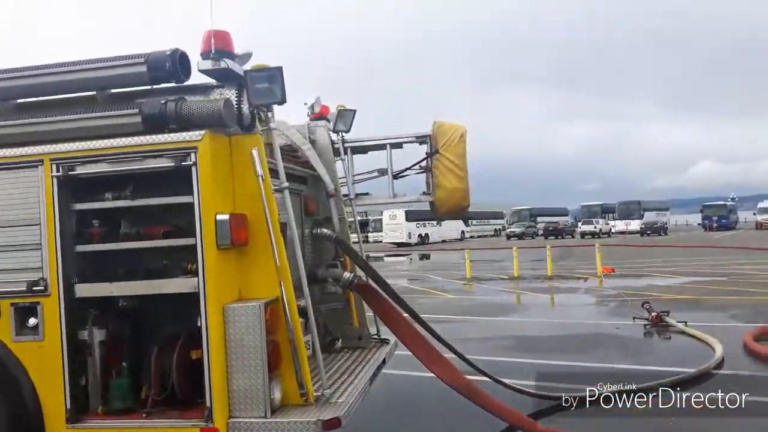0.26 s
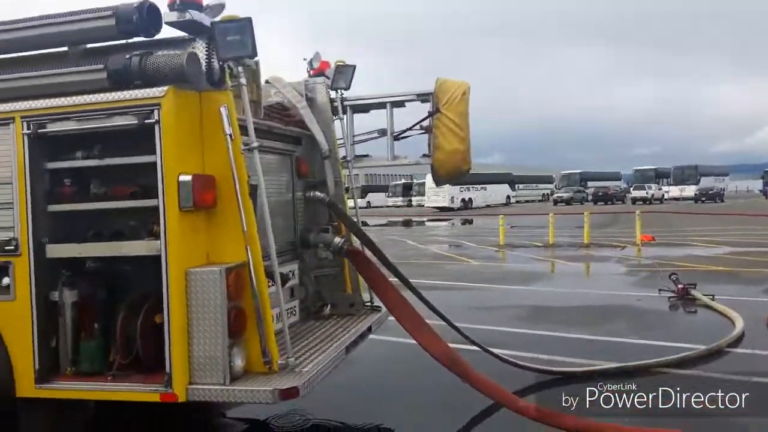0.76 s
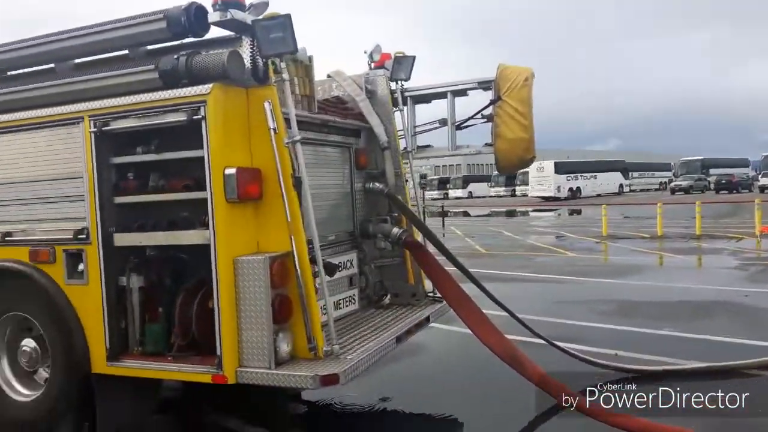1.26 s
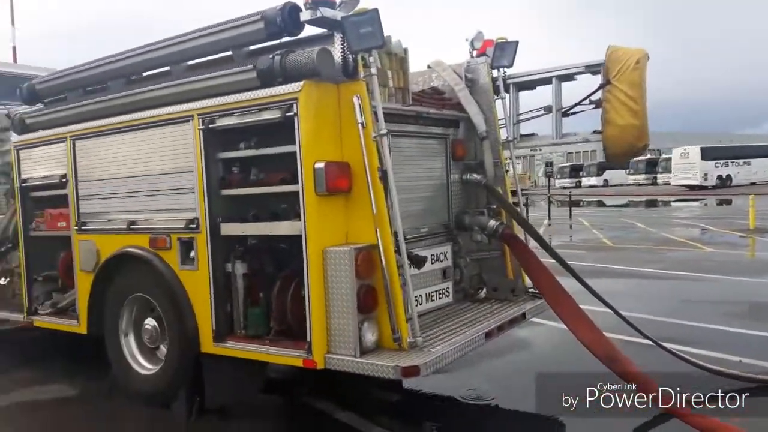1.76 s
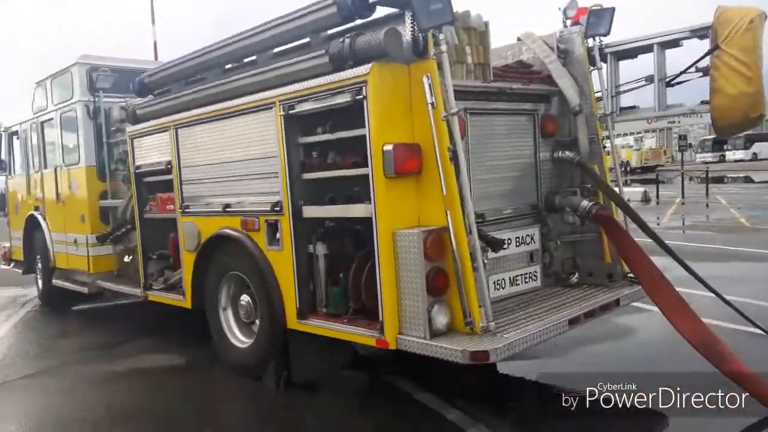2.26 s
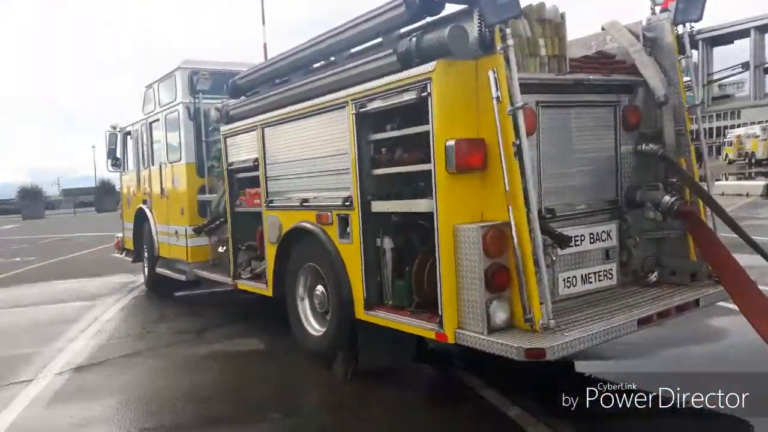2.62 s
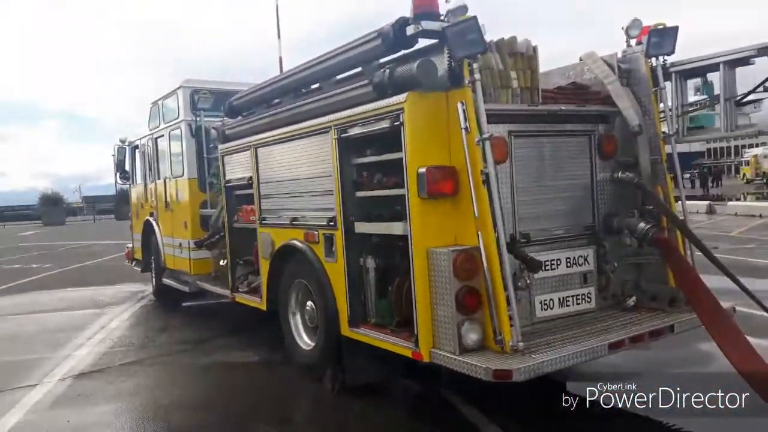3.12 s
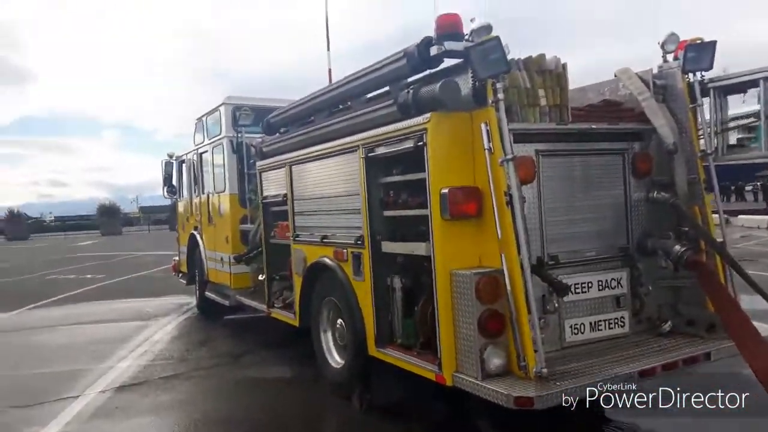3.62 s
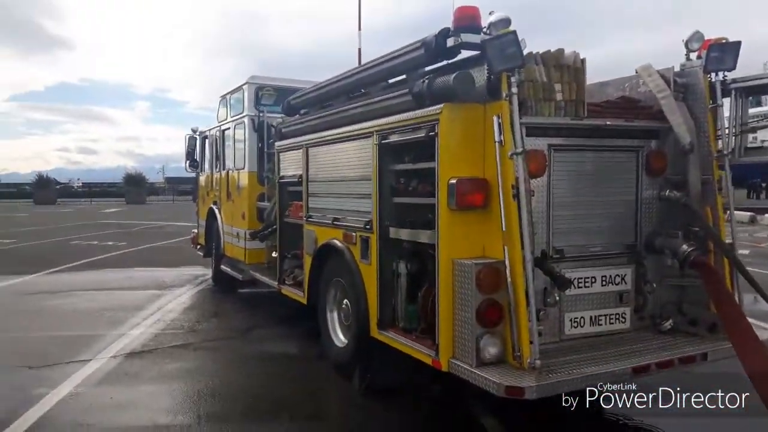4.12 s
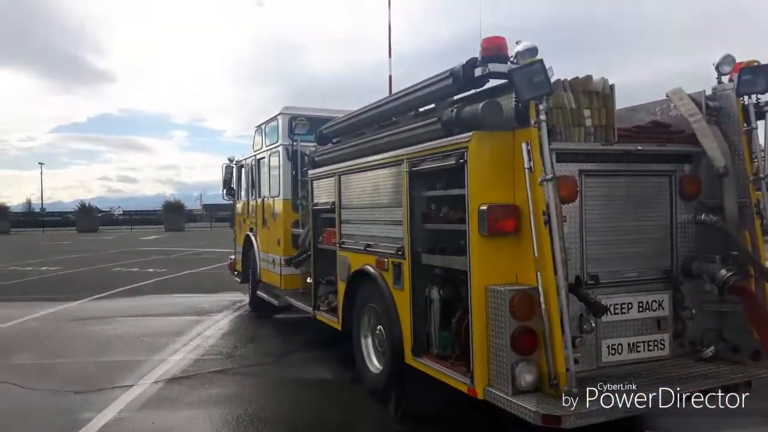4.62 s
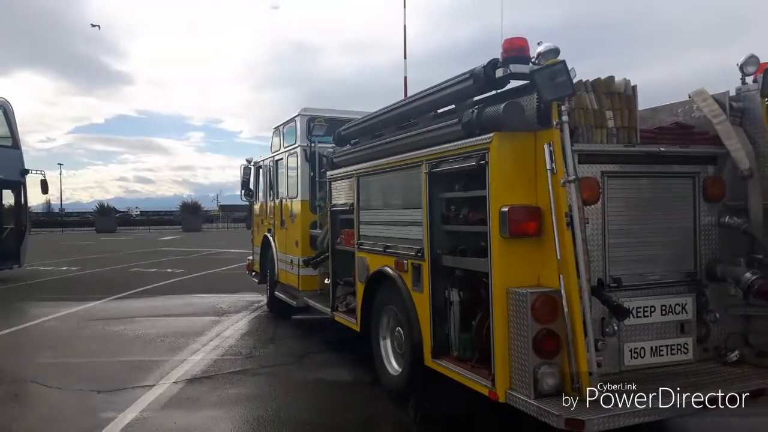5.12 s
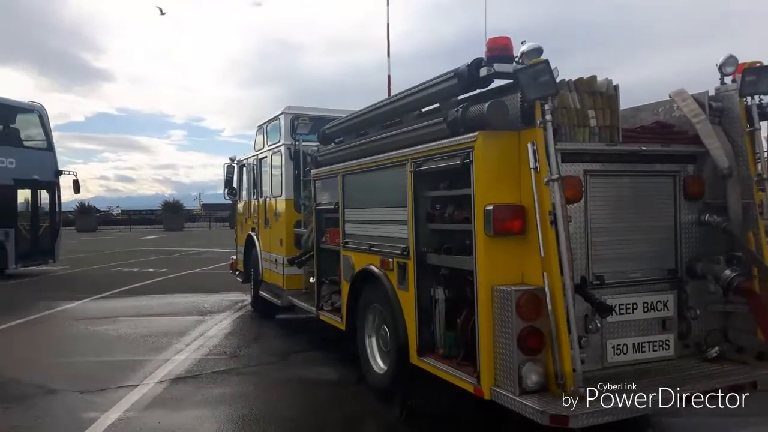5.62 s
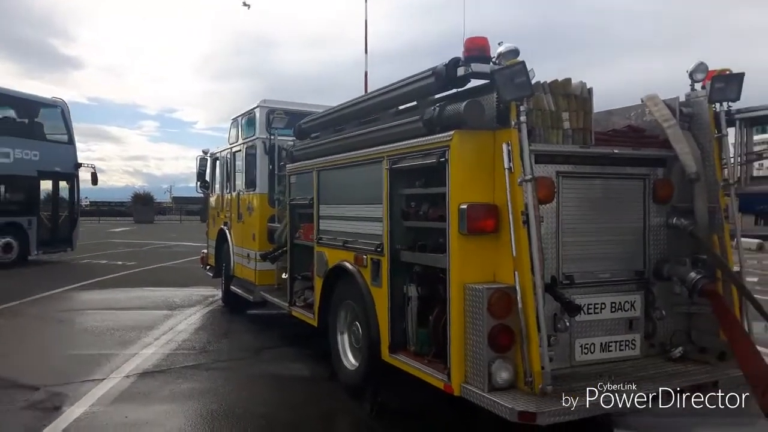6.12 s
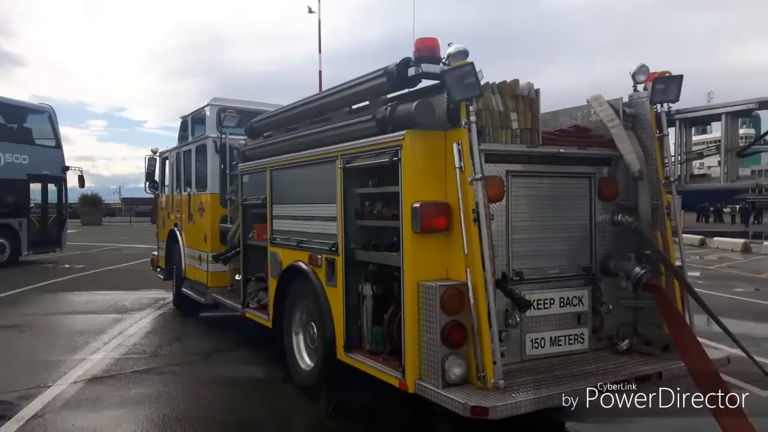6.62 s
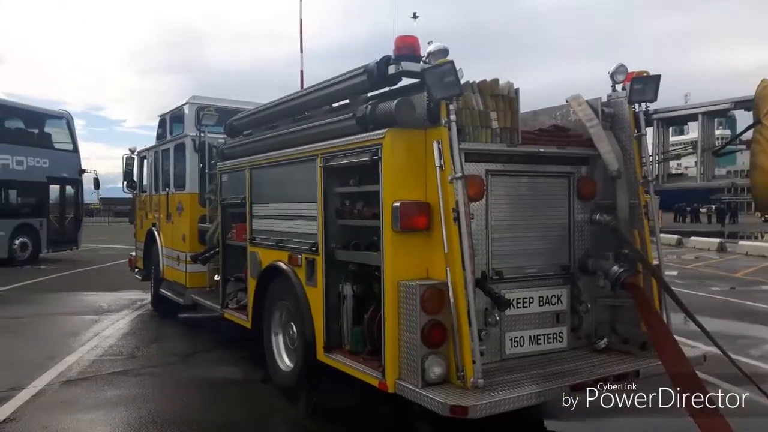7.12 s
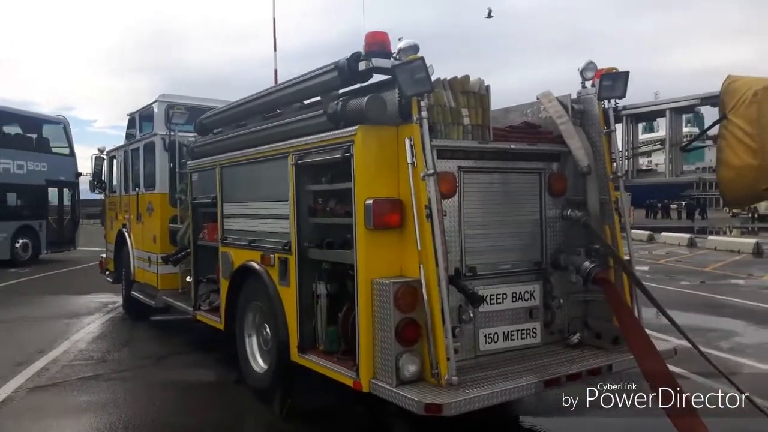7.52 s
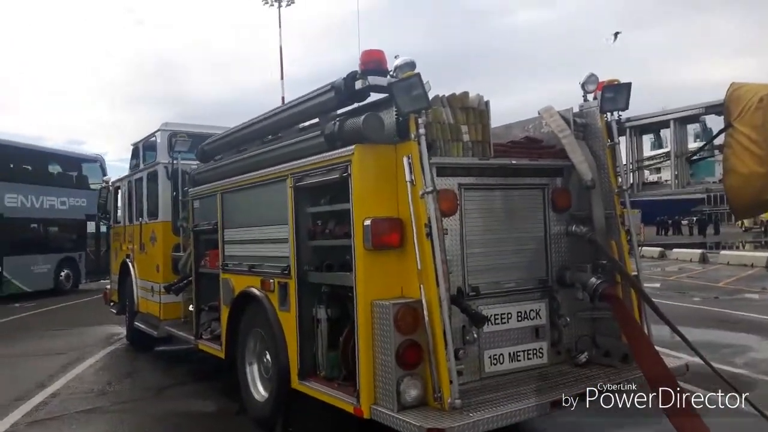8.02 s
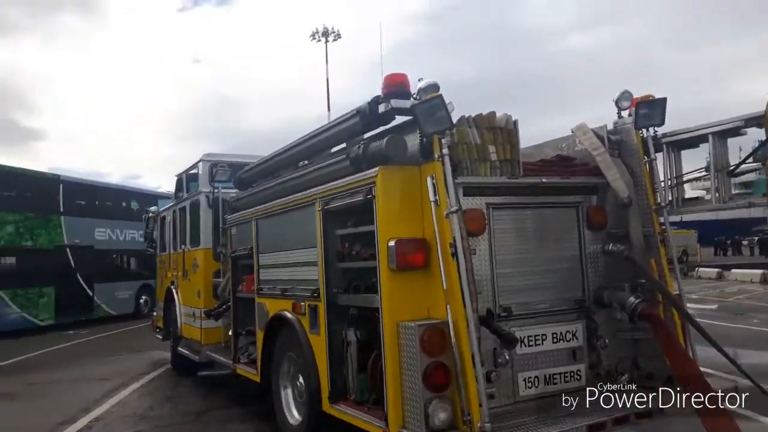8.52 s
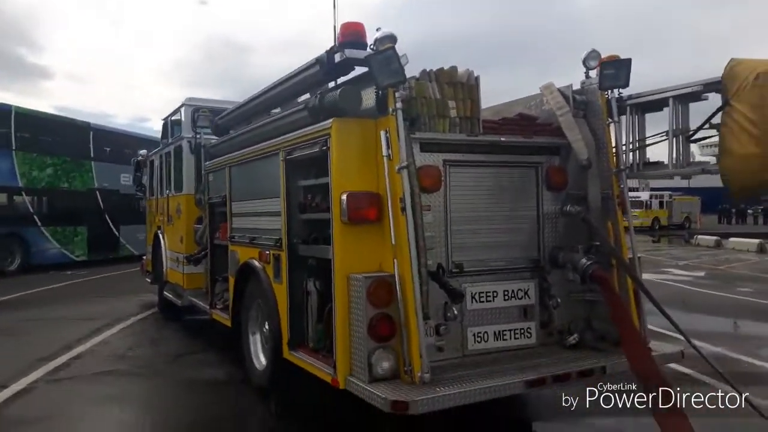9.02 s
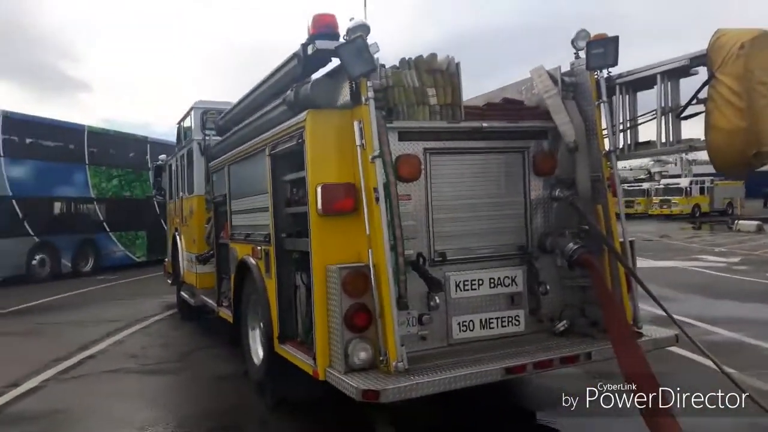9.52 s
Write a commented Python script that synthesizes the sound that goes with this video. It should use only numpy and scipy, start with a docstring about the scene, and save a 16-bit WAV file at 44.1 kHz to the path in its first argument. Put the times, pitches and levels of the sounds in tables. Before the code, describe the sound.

Outdoors on an open, wet asphalt lot, a large six-cylinder diesel runs continuously at a fast idle of about 1050 rpm, driving a pump. From 0 to 2 seconds, heard from behind, it is a low exhaust drone and hollow midrange roar with gear whine around 700 to 750 hertz fading by 1.5. From 2 to 5 seconds the microphone moves round to the side; injector clatter becomes brighter and the whine returns, wavering. Gritty shoe scuffs come at 3.3 to 4.2, with a sharp click near 4.1, then small dry ticks from 4.7 to 6.8. Engine speed sags slightly near 5.5 and recovers. Very faint high whistle and air hiss sit on top. From 9 seconds wind thumps the microphone, strongest at 9.1, 9.4 and 9.6, while the engine picks up and its pitch rises until the end at about 9.8.

```python
"""On a wet, open asphalt lot a fire engine's six-cylinder diesel turns at about 1050 rpm to drive its pump.
The listener walks from the tail round to the side, where the injector clatter is louder.
Noise pulsed by the firing makes exhaust, block and clatter; crank-locked tones make the whine of gears.
Sine tones of wandering pitch make the faint turbo whistle, short noise bursts the scuffing shoes.
At the end the engine picks up while puffs of wind, drawn as pressure curves, thump on the microphone."""
import sys
import numpy as np
from scipy import signal
from scipy.fft import rfft, irfft, next_fast_len
from scipy.io import wavfile
from scipy.ndimage import uniform_filter1d

SR = 44100
rng = np.random.default_rng(int(sys.argv[2]) if len(sys.argv) > 2 else 0)


def digitize_waveform(pressure):
    """Quantize a signal to 16-bit integers and store it at the path in sys.argv[1].

    Rows of a 2-D input are taken as channels; values are limited to [-1, 1].
    """
    field = np.atleast_2d(pressure).T
    bounded = np.clip(field, -1, 1)
    quanta = np.round(bounded * 32767).astype(np.int16)
    wavfile.write(sys.argv[1], SR, quanta)


N = 430416   # length in samples
CYLINDERS = 6
CUTOFF_HZ = 15500   # the sound is cut steeply above this


def from_db(db):
    """Decibels to gain."""
    return 10 ** (np.asarray(db) / 20)


def rms_one(x):
    """Scale to unit rms."""
    return x / np.sqrt(np.mean(x ** 2) + 1e-20)


def in_time(rows):
    """One curve per column after the seconds, joined by straight lines."""
    s, *columns = np.transpose(rows)
    return [np.interp(np.arange(N) / SR, s, c) for c in columns]


def bell(x, centre, half_width):
    """A smooth hump of height 1, down to 1/e at the half-width."""
    return np.exp(-np.minimum(((x - centre) / half_width) ** 2, 50))


def drift(rate):
    """Random wander with rms 1: noise through two equal low-pass poles at `rate` Hz."""
    step = 40   # samples between the points of the wander
    r = np.exp(-2 * np.pi * rate * step / SR)
    noise = rng.standard_normal(N // step + 2002)
    slow = signal.lfilter([1], [1, -2 * r, r * r], noise)[2000:]   # drop the filter's start
    return np.interp(np.arange(N) / step, np.arange(len(slow)), rms_one(slow))


def colour(x, spectrum):
    """Filter a signal by a curve of (Hz, dB) points, rolled off outside its ends; rms 1."""
    size = next_fast_len(N + 8192)
    hz, db = np.transpose(spectrum)
    bins = np.maximum(np.fft.rfftfreq(size, 1 / SR), 1)
    gain = from_db(np.interp(np.log(bins), np.log(hz), db))
    gain *= np.minimum(1, bins / hz[0]) ** 2    # 12 dB per octave below
    gain *= np.minimum(1, hz[-1] / bins) ** 4   # 24 dB per octave above
    return rms_one(irfft(rfft(x, size) * gain, size)[:N])


def passing(db, swells):
    """Gain along the walk: the level all round, plus in power a swell wherever a beam is crossed."""
    t = np.arange(N) / SR
    beams = sum((from_db(top_db) * bell(t, s, half_s)) ** 2 for s, top_db, half_s in swells)
    return np.sqrt(from_db(db) ** 2 + beams)


def tone(turns, order, flutter):
    """A line at `order` cycles per unit of `turns`, fluttering in level and phase in the moving air."""
    phase = 2 * np.pi * (order * turns + rng.random()) + flutter * drift(4.7)
    return rms_one((1 + flutter * drift(3.3)) * np.cos(phase))


def firing(turns, depth, decay, uneven_db, alternate_db):
    """Each cylinder fires once in two turns, every other one louder; the blow swells and dies by the next."""
    count = turns * CYLINDERS / 2
    index, since = count.astype(int), count % 1
    own = rms_one(rng.standard_normal(CYLINDERS))[index % CYLINDERS]   # returns with the cylinder
    chance = rng.standard_normal(index[-1] + 1)[index]                 # new for every firing
    strength_db = uneven_db * (own / 2 + chance) / 2 + alternate_db * (index % 2)
    blow = from_db(strength_db) * np.exp(-since / decay) * np.sin(np.pi * since)
    depth = np.clip(depth, 0, 1)
    return 1 - depth + depth * rms_one(blow)


def shaking(turns, repeat):
    """Vibration that partly repeats with every two-turn engine cycle, its pattern changing slowly."""
    size, same = int(2 * N / turns[-1]), 0   # samples in a mean cycle
    for _ in range(3):   # three patterns fade in and out of each other
        cycle = signal.resample(rng.standard_normal(size), 4 * size)
        same = same + drift(0.38) * cycle[(turns / 2 % 1 * len(cycle)).astype(int)]
    same = same / np.sqrt(uniform_filter1d(same ** 2, size=SR // 2) + 1e-9)   # even out the level
    repeat = np.clip(repeat, 0, 1)
    return np.sqrt(repeat) * same + np.sqrt(1 - repeat) * rng.standard_normal(N)


# Listener's position. Each row: time in seconds, place (0 behind the truck, 0.5 rear corner, 1 beside it).
POSITION = [(0, 0.17), (1.3, 0.12), (2.2, 0.4), (2.8, 0.4), (4, 0.59), (4.6, 0.68), (5.1, 0.9),
            (9.76, 0.87)]


def as_heard(x, spectra):
    """Blend the spectra that belong to evenly spaced places along the walk."""
    place = np.clip(in_time(POSITION)[0], 0, 1) * (len(spectra) - 1)
    return sum(np.maximum(1 - abs(place - k), 0) * colour(x, spectrum)
               for k, spectrum in enumerate(spectra))


# Tone of the air hiss. Each row: frequency in Hz, relative level in dB per Hz.
HISS_SPECTRUM = [(3000, -7.5), (6000, 0.5), (6900, 4.5), (7600, 3), (8300, 3.5), (8800, 0), (9600, 2.5),
                 (10500, 0), (12400, 1), (13200, 4), (15400, 2.5)]


def air_hiss(level_db):
    """Steady noise, shaped towards the treble, follows the hiss level along the walk."""
    return from_db(level_db) * colour(rng.standard_normal(N), HISS_SPECTRUM)


# Tone of the wind noise. Each row: frequency in Hz, relative level in dB per Hz.
WIND_SPECTRUM = [(20, -26), (45, -12), (75, 0), (120, 2), (180, 0), (280, -16.5), (600, -39), (2000, -68)]
# Gusts swelling out of the breeze. Each row: centre in seconds, top level in dB, half-length in seconds.
WIND_GUSTS = [(0.998, -40, 2.1), (3.297, -37.5, 0.26), (9.003, -40.5, 0.57), (9.39, -31, 0.049),
              (9.632, -30, 0.18)]
# Single eddies. Each row: centre in seconds, approximate peak level in dB, width of the peak (sigma) in ms.
WIND_PUFFS = [(9.01, -21, 1.7), (9.1176, -11.5, 0.94), (9.127, -10.5, 1.15), (9.135, -19, 0.73),
              (9.336, -15, 1.2), (9.371, -17, 0.97), (9.381, -16, 1.1), (9.3935, -12.5, 0.94),
              (9.412, -19, 1), (9.455, -22, 1.3), (9.593, -4, 0.79), (9.617, -19, 1), (9.632, -17, 1.1),
              (9.741, -18, 1.1)]
BREEZE_DB = -60
TROUGH_LAG, TROUGH_WIDTH = 0.88, 2.6   # lag in units of the puff's width; breadth of the trough


def wind():
    """Turbulence comes in lumpy gusts; an eddy is a sharp peak and a wider, later trough of like area."""
    t = np.arange(N) / SR
    gusts = sum(from_db(db) * bell(t, s, half_s) for s, db, half_s in WIND_GUSTS)
    lumps = from_db(2.1 * drift(13))
    out = (from_db(BREEZE_DB) + gusts) * lumps * colour(rng.standard_normal(N), WIND_SPECTRUM)
    for s, db, ms in WIND_PUFFS:
        away = (t - s) / (ms / 1000) / np.sqrt(2)
        peak = TROUGH_WIDTH * bell(away, 0, 0.97)
        trough = bell(away, TROUGH_LAG / np.sqrt(2), TROUGH_WIDTH)
        out = out + from_db(db) * (peak - trough) / (TROUGH_WIDTH - 1)
    return out


# Hums, perhaps from other vehicles. Each row: pitch in Hz, rms level all round in dB, and a list of
# swells, each with centre in seconds, rms level in dB and half-length in seconds.
STEADY_HUMS = [(146, -48, []), (236, -47, []), (292.9, -50.5, [(3.1, -38, .5), (7.1, -39, 0.81)]),
               (562, -55.5, [(3.15, -42.5, 0.84), (6.4, -47, .5)]), (592, -59, [(8.1, -48.5, .5)])]


def hums():
    """Hums hold their pitch whatever the engine does."""
    t = np.arange(N) / SR
    return sum(passing(db, swells) * tone(t, hz, flutter=0.22) for hz, db, swells in STEADY_HUMS)


# Shoe scuffs and ticks on the asphalt, and four very faint treble ticks (those below -60 dB).
# Each row: start in seconds, level before the decay in dB, band centre in Hz, bandwidth in octaves,
# decay time in seconds.
SCUFFS_AND_TICKS = [(.296, -71.5, 10600, .6, 0.014), (.667, -69, 11000, 1, 0.0055),
                    (2.794, -41, 2800, 1, .005), (2.842, -68, 13000, .6, .015),
                    (3.016, -70, 13000, .6, .008), (3.325, -41, 2200, 1.05, .03),
                    (3.399, -42, 2150, 1.6, 0.011), (3.485, -40, 2100, 1.3, 0.034),
                    (3.542, -32.5, 1740, .9, 0.009), (3.66, -42, 2100, 1.3, .012),
                    (3.829, -36, 1650, 1.2, 0.007), (4.049, -36, 1450, 1.5, 0.044),
                    (4.083, -22.5, 1520, 0.72, 0.0045), (4.105, -37, 1550, 1.2, 0.035),
                    (4.157, -34.5, 1750, 1.8, 0.02), (4.66, -29, 3000, .6, 0.002),
                    (5.008, -30, 2600, 0.64, 0.005), (5.338, -38, 3200, 0.46, .005),
                    (5.534, -33, 3100, .5, 0.0068), (5.674, -37, 3100, .5, .006),
                    (6.118, -31.5, 3050, .5, 0.0077), (6.292, -30.5, 3100, .5, .002),
                    (6.821, -37, 2850, 0.7, .012)]


def scuffs_and_ticks():
    """Short bursts of spiky, band-limited noise: shoes on the asphalt, and a few faint treble ticks."""
    out, t = np.zeros(N), np.arange(SR // 4) / SR
    for s, db, hz, octaves, decay in SCUFFS_AND_TICKS:
        spiky = rng.standard_normal(len(t)) * np.sqrt(rng.exponential(1, len(t)))
        half = 2 ** (octaves / 2)
        edges = [hz / half, min(hz * half, CUTOFF_HZ)]
        band = signal.butter(5, edges, "band", fs=SR, output="sos")
        burst = signal.sosfilt(band, spiky * np.exp(-t / decay))
        at = round(s * SR)
        out[at:at + len(t)] += from_db(db) * burst / np.std(signal.sosfilt(band, spiky))
    return out


# Whistle pitch. Each row: time in seconds, frequency in Hz.
TURBO_PITCH = [(0, 13230), (1.2, 13120), (2.0, 13050), (2.7, 13080), (3.4, 13500), (4.1, 13250),
               (4.7, 13300), (5.8, 12640), (6.2, 12930), (7.1, 13170), (7.7, 13070), (8.2, 12760),
               (8.7, 12730), (9.35, 13030), (9.76, 13650)]
# Patches where the whistle carries. Each row: centre in seconds, rms level in dB, half-length in seconds.
TURBO_PATCHES = [(.45, -86, .5), (1.2, -80, 0.33), (3.398, -86, .4), (4.6, -86, .4), (5.85, -82, .6),
                 (7, -85, 2.6), (7.4, -76.5, .5), (8.55, -77.5, 0.43), (9.4, -81, .45)]
TURBO_DB = -97.5   # level between the patches
# Fainter, lower whistle. Each row: time in seconds, frequency in Hz, rms level in dB.
BREATHY_WHISTLE = [(0, 8350, -104), (1.2, 8330, -90), (1.7, 8330, -108), (3.6, 8450, -104),
                   (4.3, 8450, -89), (5.0, 8400, -96), (6.3, 8350, -97), (7.0, 8350, -88), (8.3, 8100, -86),
                   (8.8, 8150, -94), (9.76, 8400, -96)]


def whistle(hz, jitter_hz, waver_db, waver_rate):
    """A sine with jittered pitch and wavering level; rms 1."""
    sine = np.sin(2 * np.pi * np.cumsum(hz + jitter_hz * drift(90)) / SR)
    return rms_one(sine * from_db(waver_db * drift(waver_rate)))


def turbo():
    """Compressor blades whistle at an unsteady pitch, in patches, with a breathier whistle lower down."""
    hz, = in_time(TURBO_PITCH)
    low_hz, low_db = in_time(BREATHY_WHISTLE)
    blades = passing(TURBO_DB, TURBO_PATCHES) * whistle(hz, 40, waver_db=2, waver_rate=14)
    lower = from_db(low_db) * whistle(low_hz, 65, waver_db=3, waver_rate=6)
    return blades + lower


# Swells of the belt whine. Each row: centre in seconds, rms level in dB, half-length in seconds.
BELT_BEAMS = [(3.1, -40.5, 1.3), (9.1, -45, .45), (9.72, -42, .15)]
BELT_DB = -48   # level all round
BELT_ORDER, BELT_SLIP = 36.9, .0022   # cycles per crank turn; spread of the slip as a fraction of speed


def belt_whine(speed):
    """A belt-driven accessory, perhaps the alternator, follows the crank loosely as the belt slips."""
    turns = np.cumsum(speed * (1 + BELT_SLIP * drift(1.5))) / SR
    return passing(BELT_DB, BELT_BEAMS) * tone(turns, BELT_ORDER, flutter=0.16)


# Level of the pump's gear whine. Each row: time in seconds, rms level in dB.
PUMP_LEVEL = [(0, -41), (0.6, -36), (1.1, -39.5), (1.5, -60), (2.2, -52.5), (2.9, -42), (4, -35),
              (4.6, -40), (5.1, -36), (5.5, -42.5), (6, -38.5), (7.1, -37.5), (7.9, -41.5), (8.25, -47.5),
              (8.7, -38), (9.1, -39.5), (9.4, -61), (9.76, -45)]
PUMP_ORDER = 42   # cycles per crank turn


def pump_whine(turns):
    """The pump's drive gears sing on one line, which comes and goes along the walk."""
    return from_db(in_time(PUMP_LEVEL)[0]) * tone(turns, PUMP_ORDER, flutter=0.22)


# Engine and gear tones, beamed by the bodywork. Each row: order in cycles per crank turn, rms level all
# round in dB (db), and swells, each with centre in seconds, rms level in dB and half-length in seconds.
ENGINE_TONES = [ dict(order=3, db=-60.5, swells=[(2.5, -51.5, 2.2)]),
                dict(order=6, db=-43, swells=[(3.3, -40, .8), (8.7, -44, 0.95)]),
                dict(order=7, db=-49.5, swells=[]), dict(order=9, db=-44.5, swells=[(1.9, -36.5, .6),
                (5.1, -38.5, 1.2), (7.3, -38.5, 0.96)]), dict(order=10.5, db=-54, swells=[(5.4, -45, 1.8),
                (7.8, -44, .9)]), dict(order=12, db=-55.5, swells=[(7, -47, 2.3)]),
                dict(order=12, db=-46, swells=[(1.7, -39.5, 1.0), (4.3, -40, .6), (6, -45.5, 1)]),
                dict(order=15, db=-56.5, swells=[(7.4, -46, 1.5), (9.6, -43, .4)]),
                dict(order=16, db=-56, swells=[(6.8, -45, 1.8)]),
                dict(order=17, db=-41.5, swells=[(.1, -35, 0.53), (7, -38.5, 1), (9.45, -31.5, 0.54)]),
                dict(order=18, db=-50, swells=[(2.6, -38.5, 0.43), (6.2, -37, 0.58), (7.6, -43, 0.7),
                (9.45, -37, 0.37)]), dict(order=19, db=-46.5, swells=[(4.4, -39.5, 1.4)]),
                dict(order=19.5, db=-51, swells=[(1.8, -39, 0.6), (5.1, -37.5, 0.77)]),
                dict(order=22.5, db=-53.5, swells=[(4.1, -43, 0.45), (6.3, -40.5, 1.5)]),
                dict(order=24, db=-52, swells=[(4.5, -41, 0.58), (8.3, -44.5, 0.77)]),
                dict(order=25.5, db=-57, swells=[(2.15, -40.5, .3), (4.8, -43, 0.91)]),
                dict(order=30, db=-59, swells=[(.2, -47, .7), (9.4, -49.5, .45)]),
                dict(order=34, db=-52.5, swells=[(2.8, -48.5, 1.3)]),
                dict(order=41, db=-54.5, swells=[(3.6, -47.5, 1), (7.6, -45.5, .8)]),
                dict(order=51, db=-58, swells=[(7.4, -43, 1.1)]),
                dict(order=55.5, db=-62.5, swells=[(3.9, -53, .8)]),
                dict(order=60, db=-57.5, swells=[(9.7, -54, 0.4)]), dict(order=62, db=-53.5, swells=[]),
                dict(order=63.5, db=-55, swells=[(5.05, -46, 0.47), (9.2, -52, .6)]),
                dict(order=73.75, db=-60.5, swells=[(9.4, -48.5, 0.38)]),
                dict(order=105, db=-66, swells=[(9.25, -54.5, .35)]),
                dict(order=110.25, db=-65.5, swells=[(7.74, -56.5, 0.38)]),
                dict(order=119, db=-66, swells=[(8.85, -51, 0.18)]),
                dict(order=144.75, db=-70.5, swells=[(9.25, -53, 0.38)]),
                dict(order=147.5, db=-68.5, swells=[(9.3, -52.5, 0.39)]),
                dict(order=166.5, db=-71, swells=[(9.45, -55, .4)]),
                dict(order=170.5, db=-71, swells=[(9.25, -56, .4)])]


def beamed_tones(turns):
    """Engine and gear orders, each wavering and swelling in its own places."""
    return sum(passing(row["db"], row["swells"]) * tone(turns, row["order"], flutter=0.25)
               for row in ENGINE_TONES)


# Clatter from behind, at the rear corner, beside. Each row: frequency in Hz, relative level in dB per Hz.
TICKS_BEHIND = [(1200, -28), (2000, 5), (2500, 3), (2900, -7), (3500, 5.5), (4100, -2.5), (4500, -14.5),
                (5300, -19.5), (6400, -23.5), (7500, -43.5), (11000, -61)]
TICKS_CORNER = [(1200, -15.5), (2000, 4), (2450, -0.5), (2900, 0.5), (3450, -3), (3800, -8), (4100, -14),
                (4500, -17), (5300, -21.5), (6400, -27.5), (7500, -43.5), (11000, -59.5)]
TICKS_BESIDE = [(1500, -4.5), (2100, -5.5), (2450, -8), (2700, -2), (2900, -3.5), (3400, 1.5), (3750, -4.5),
                (3980, -24.5), (4180, -5.5), (4500, -32.5), (4830, -15.5), (5650, -24.5), (6200, -45),
                (9000, -59.5)]
CRACKLE_DB = 1.0   # spread in strength of the quick contacts


def clatter(turns, level_db):
    """Injectors and valves tick in a crackle of uneven contacts; the body shades them from behind."""
    contacts = from_db(0.48 * drift(14) + CRACKLE_DB * drift(250))
    blows = firing(turns, depth=0.15, decay=0.29, uneven_db=7.0, alternate_db=6)
    ticks = shaking(turns, repeat=0.38) * blows * contacts
    return from_db(level_db) * as_heard(ticks, [TICKS_BEHIND, TICKS_CORNER, TICKS_BESIDE])


# Ring of the block and pump casing. Each row: frequency in Hz, relative level in dB per Hz.
BLOCK_SPECTRUM = [(300, -24.5), (480, 2), (570, 5), (690, 2), (810, 0.5), (950, 2), (1130, 1.5), (1350, -5),
                  (1650, -8.5), (1980, -16), (2400, -31.5), (3600, -51)]


def block(turns, level_db):
    """Combustion knock rings in the block and pump casing."""
    blows = firing(turns, depth=0.22, decay=0.28, uneven_db=4.5, alternate_db=3.5)
    return from_db(level_db) * colour(shaking(turns, repeat=0.45) * blows, BLOCK_SPECTRUM)


# Exhaust drone at four evenly spaced places from behind the truck to beside it.
# Each row: frequency in Hz, relative level in dB per Hz.
EXHAUST_BEHIND = [(20, -44), (38, -16), (52, -7), (75, -5), (110, -2.5), (155, 2), (205, 5), (250, -10),
                  (315, -3), (365, -3), (420, -2), (490, -4), (800, -35)]
EXHAUST_ONE_THIRD = [(20, -41.5), (38, -20.5), (52, -7.5), (78, -6.5), (110, -4.5), (155, 3.5), (205, -1),
                     (250, -2.5), (315, 1.5), (365, -3.5), (420, -4.5), (490, -5.5), (800, -37)]
EXHAUST_TWO_THIRDS = [(20, -39), (38, -22.5), (54, -7.5), (78, -4.5), (110, -2.5), (155, 3), (205, -0.5),
                      (250, -4), (320, 2), (365, -4.5), (420, 0.5), (480, -8), (800, -40)]
EXHAUST_BESIDE = [(20, -39), (38, -23.5), (55, -7), (80, -5.5), (110, -4), (155, 3), (200, -1), (255, -2.5),
                  (320, 2.5), (365, -3.5), (415, -2), (475, -12.5), (800, -41.5)]


def exhaust(turns, level_db):
    """Exhaust pulses boom through pipe and bodywork."""
    blows = firing(turns, depth=0.16, decay=0.47, uneven_db=5.5, alternate_db=4)
    pulses = shaking(turns, repeat=0.45) * blows
    places = [EXHAUST_BEHIND, EXHAUST_ONE_THIRD, EXHAUST_TWO_THIRDS, EXHAUST_BESIDE]
    return from_db(level_db) * as_heard(pulses, places)


# Crankshaft hunting under the governor, then picking up. Each row: time in seconds, turns per second.
CRANK_SPEED = [(0.0, 17.783), (0.61, 17.65), (1.37, 17.44), (2.05, 17.302), (2.84, 17.819), (3.26, 17.838),
               (3.91, 17.489), (4.21, 17.49), (4.49, 17.74), (4.83, 17.162), (5.15, 17.057), (5.54, 16.981),
               (5.94, 17.36), (6.82, 17.754), (7.26, 17.656), (8.99, 17.901), (9.33, 18.276),
               (9.76, 19.332)]
# Loudness along the walk. Each row: time in seconds, exhaust drone in dB, block and pump roar in dB,
# clatter in dB, air hiss in dB.
WALK_LEVELS = [(0, -35, -37, -52, -76), (1.1, -36.5, -37, -50.5, -76), (1.65, -33.5, -38.5, -53.5, -79.5),
               (2.3, -31, -37, -51.5, -80), (3.2, -33.5, -34.5, -46.5, -75.5),
               (3.75, -32, -34.5, -44.5, -77.5), (4.5, -30, -35, -44.5, -76.5), (5.4, -32, -35.5, -43, -75),
               (6.1, -31, -34.5, -43, -74.5), (7.0, -31.5, -36.5, -43, -73.5), (7.9, -32, -36.5, -45, -73),
               (9.0, -31.5, -36.2, -42, -72), (9.76, -36, -36.5, -40.5, -70)]


def scene():
    """One crankshaft drives the engine, gear and pump sounds; the belt follows it loosely."""
    speed, = in_time(CRANK_SPEED)
    turns = np.cumsum(speed * (1 + .0008 * drift(5.74))) / SR   # crank angle in turns, slightly unsteady
    drone_db, roar_db, clatter_db, hiss_db = in_time(WALK_LEVELS)
    surroundings = air_hiss(hiss_db) + wind() + hums() + scuffs_and_ticks()
    whines = turbo() + belt_whine(speed) + pump_whine(turns) + beamed_tones(turns)
    engine = clatter(turns, clatter_db) + block(turns, roar_db) + exhaust(turns, drone_db)
    return (surroundings + whines + engine)[None]


def record(dry):
    """The sound opens within 3 ms; the top is cut steeply."""
    opening = np.minimum(np.arange(N) / (.003 * SR), 1)
    steep_cut = signal.ellip(12, .1, 80, CUTOFF_HZ, fs=SR, output="sos")
    return signal.sosfilt(steep_cut, dry * opening)


dry = scene()
out = record(dry)
digitize_waveform(out)
```